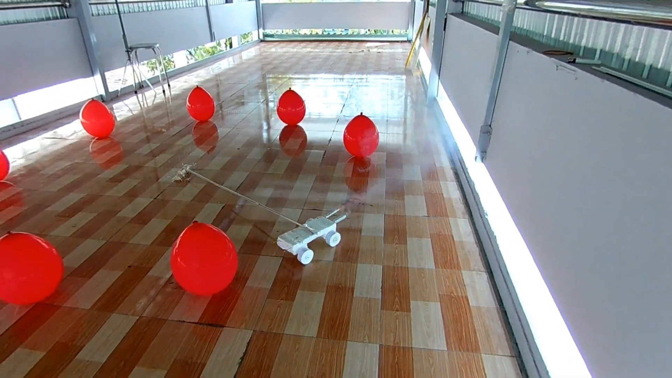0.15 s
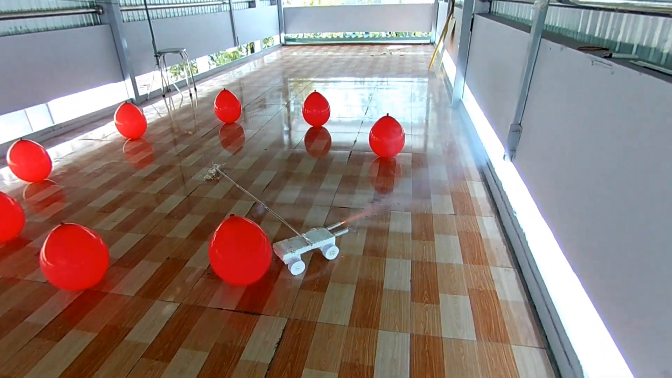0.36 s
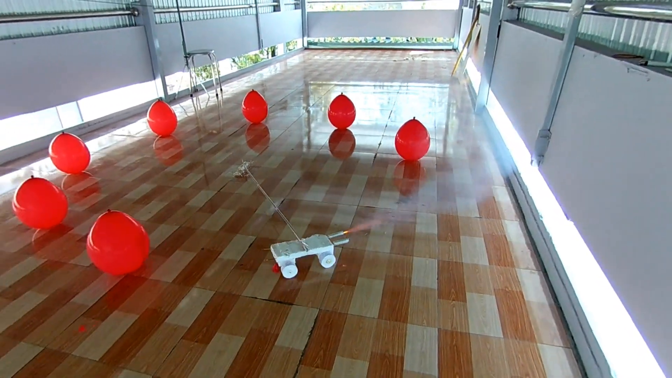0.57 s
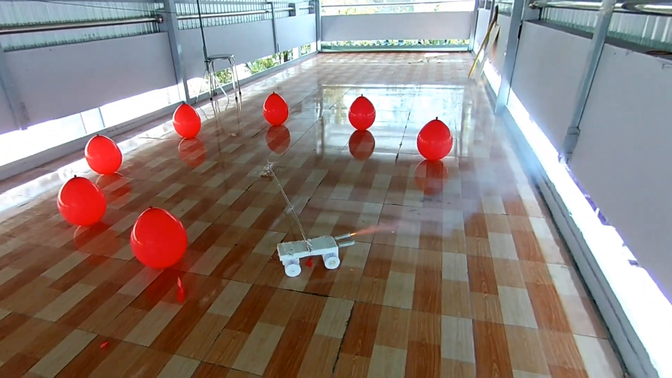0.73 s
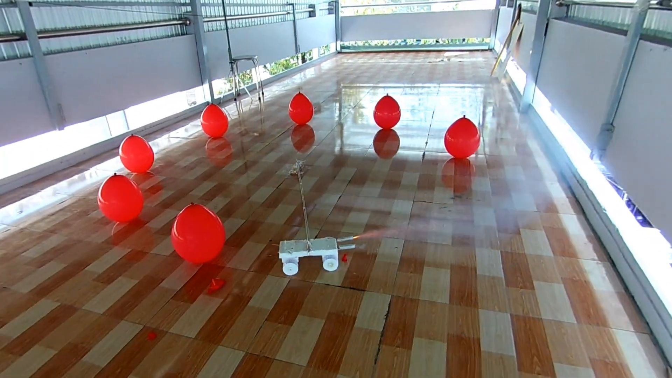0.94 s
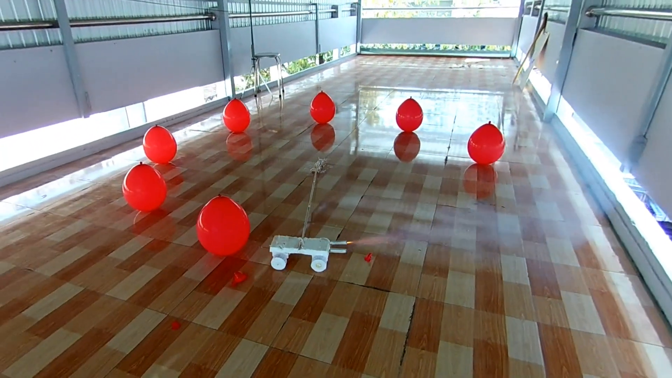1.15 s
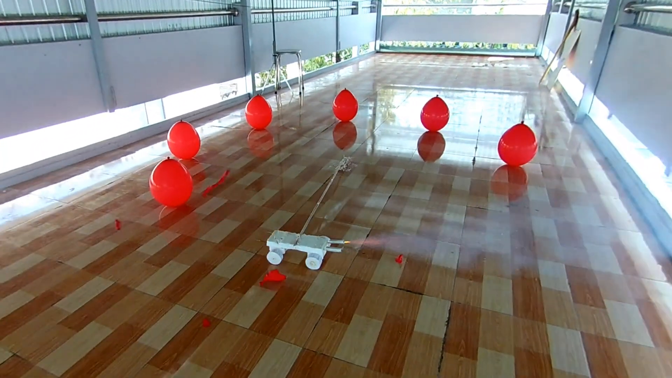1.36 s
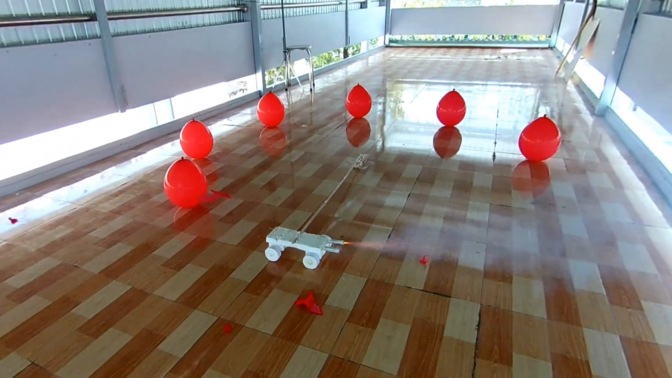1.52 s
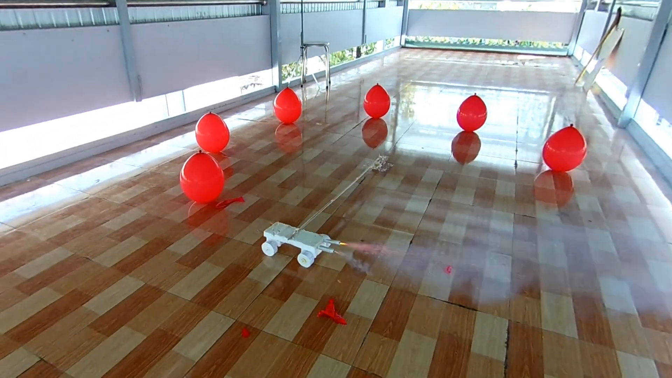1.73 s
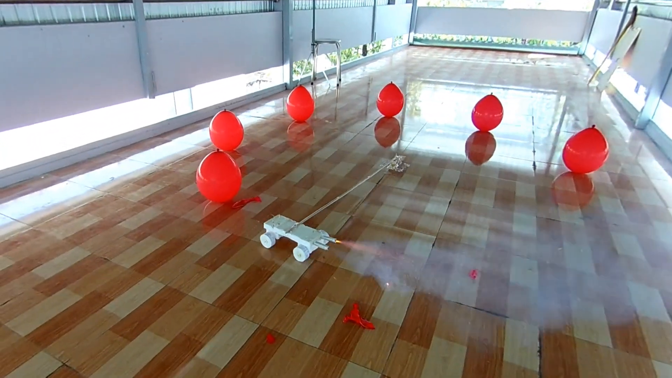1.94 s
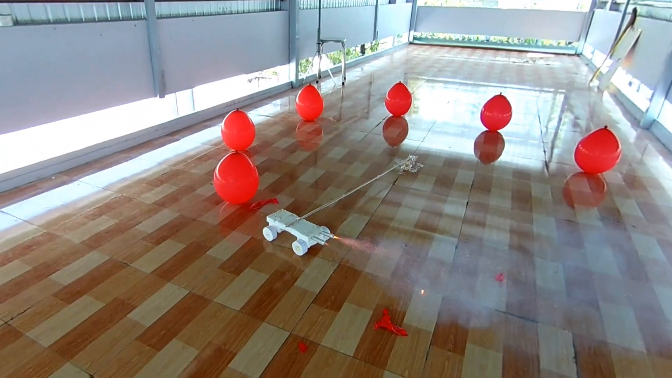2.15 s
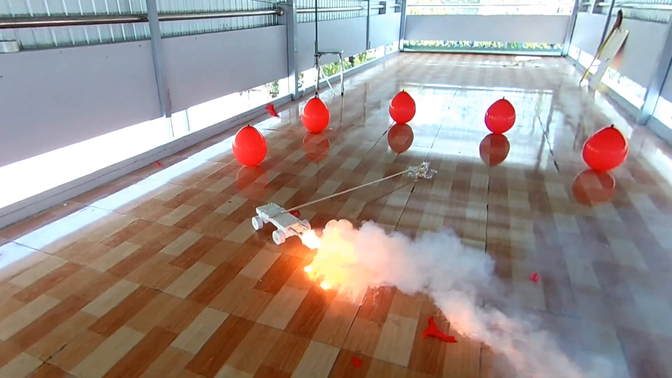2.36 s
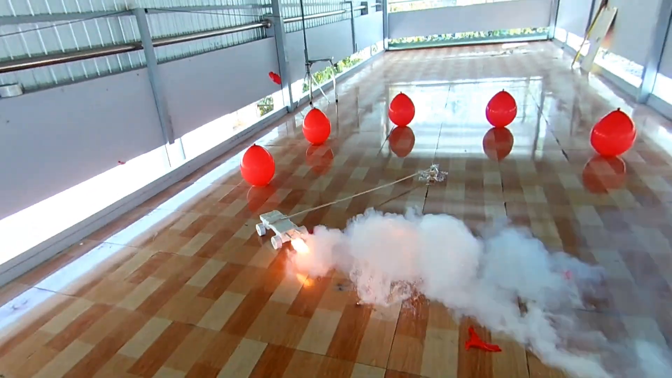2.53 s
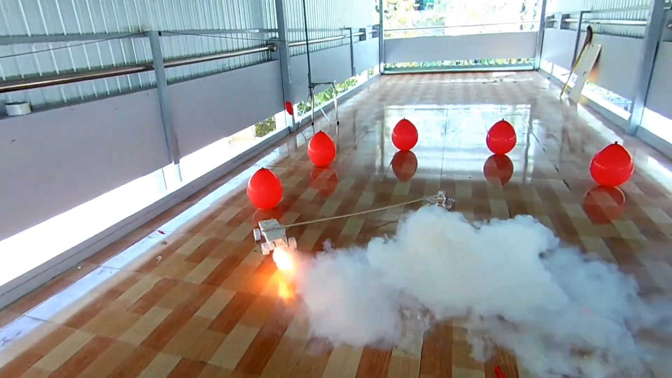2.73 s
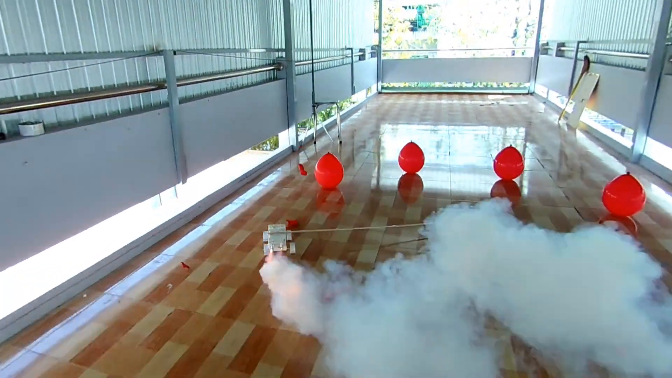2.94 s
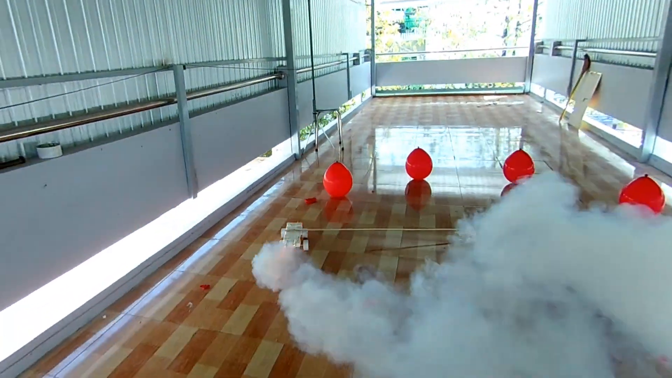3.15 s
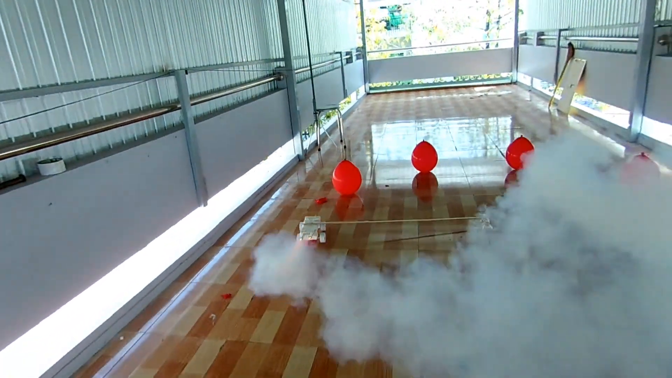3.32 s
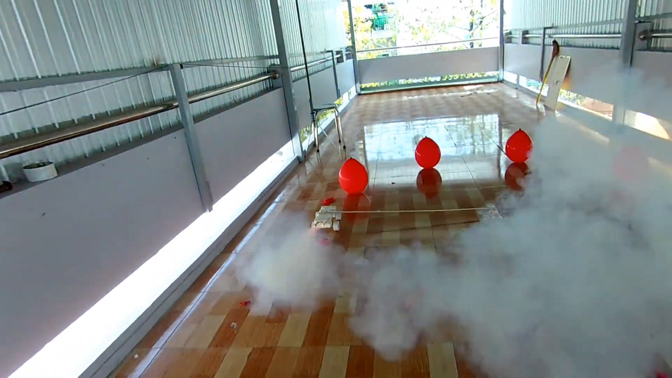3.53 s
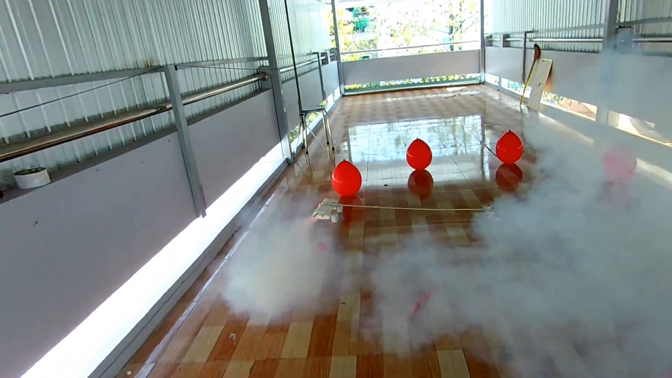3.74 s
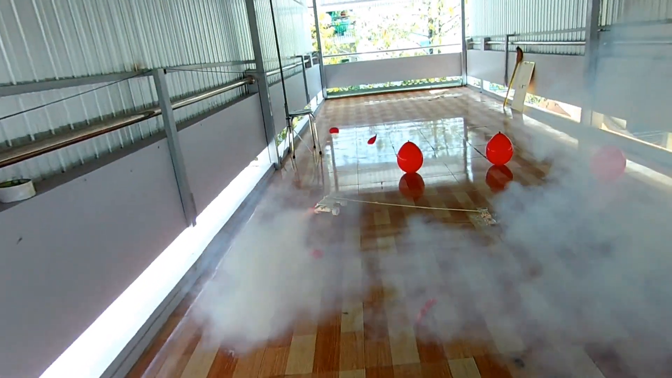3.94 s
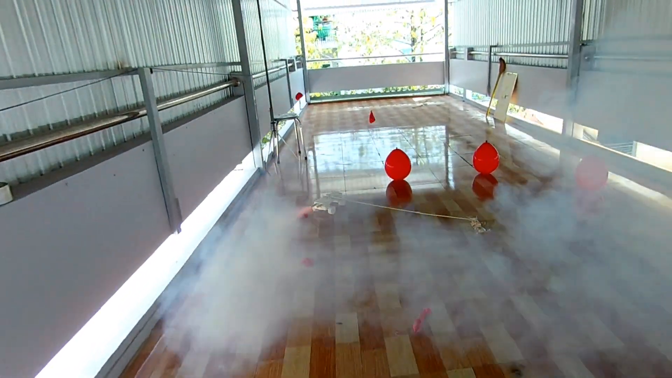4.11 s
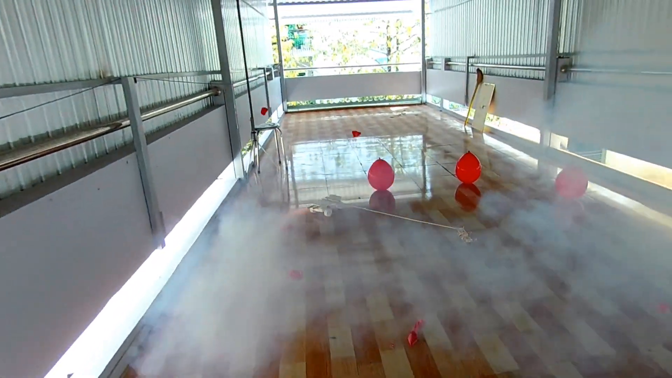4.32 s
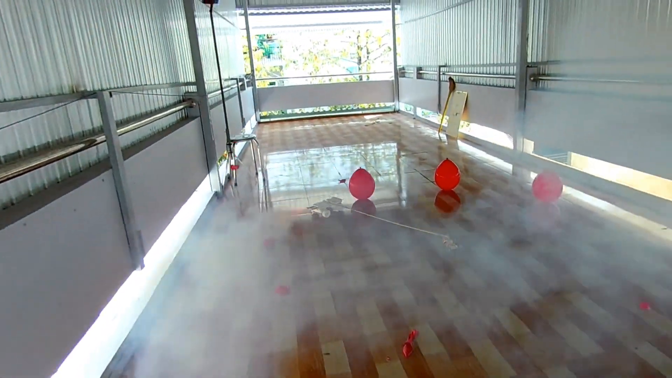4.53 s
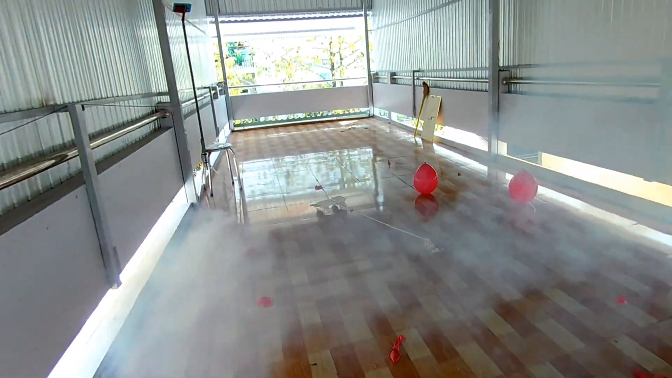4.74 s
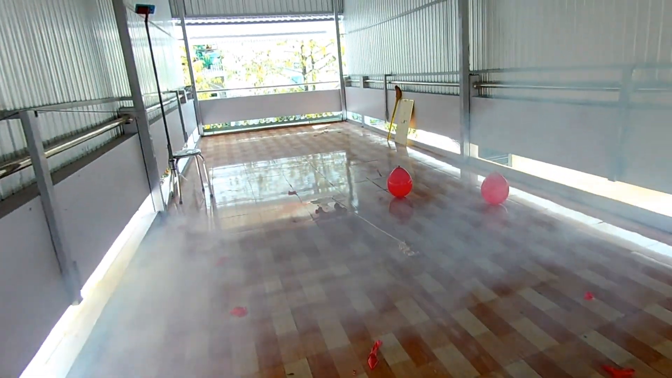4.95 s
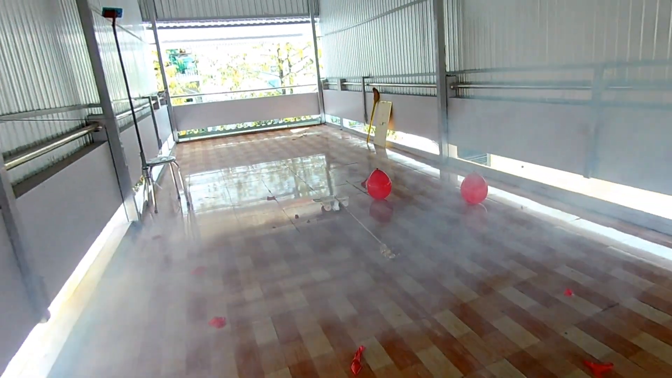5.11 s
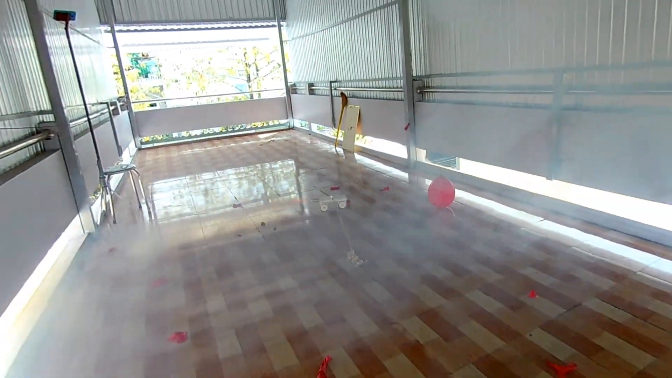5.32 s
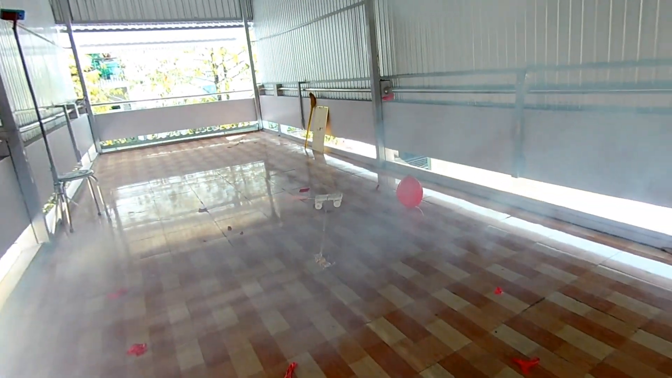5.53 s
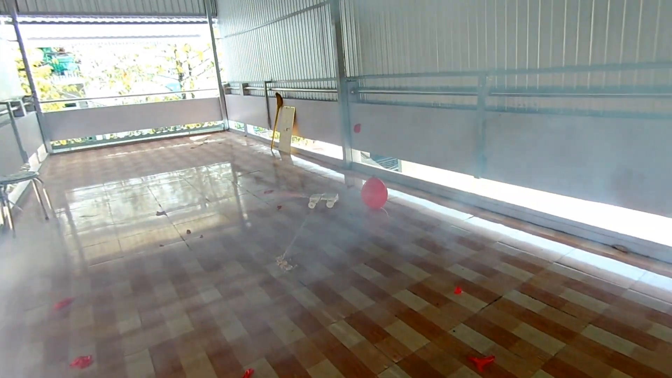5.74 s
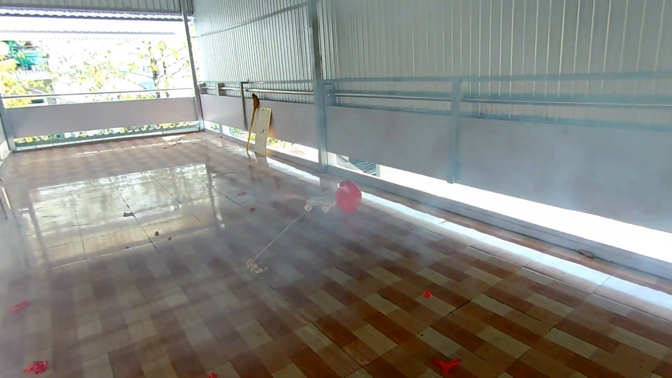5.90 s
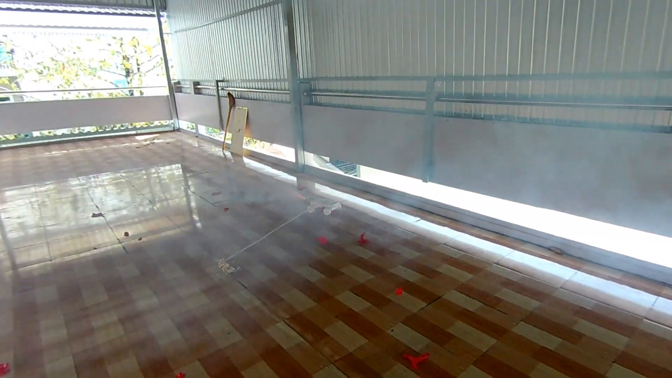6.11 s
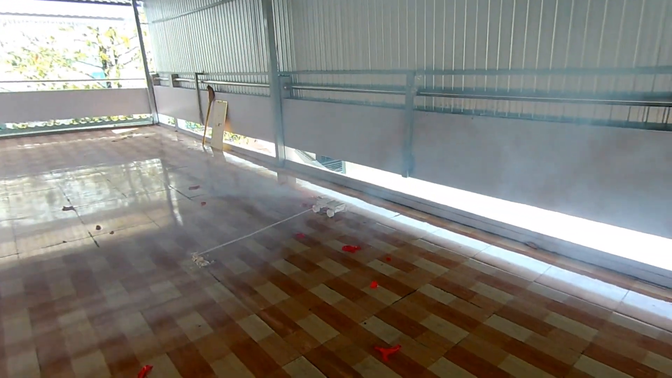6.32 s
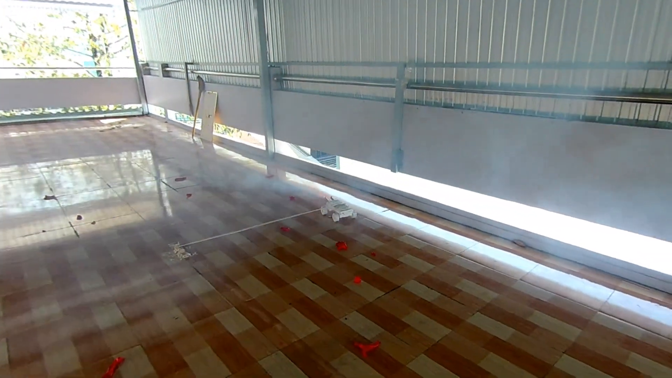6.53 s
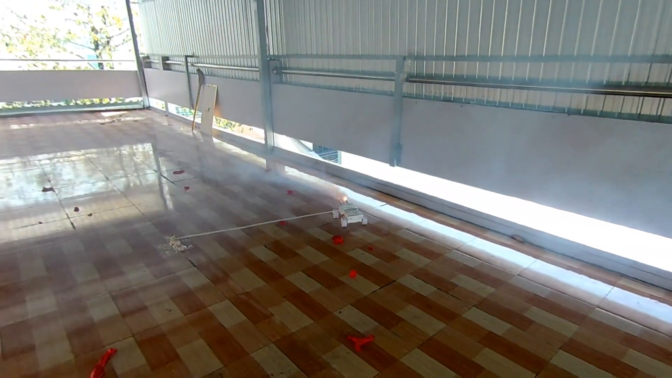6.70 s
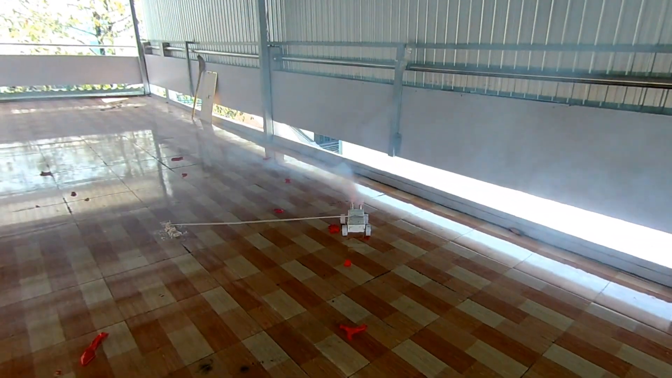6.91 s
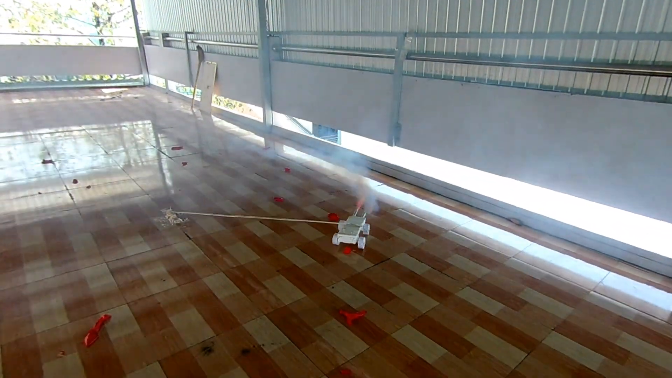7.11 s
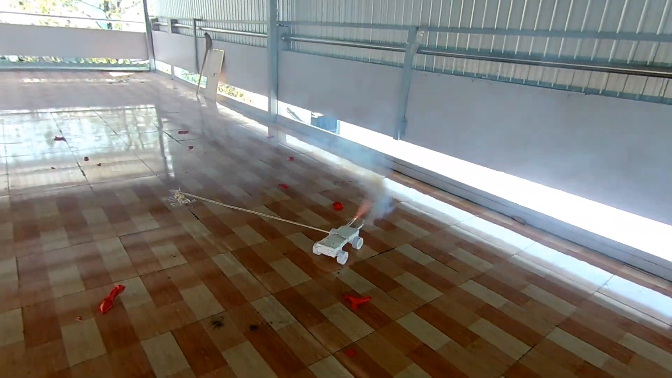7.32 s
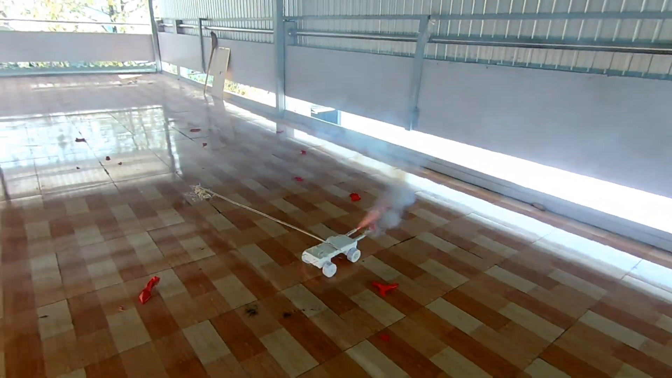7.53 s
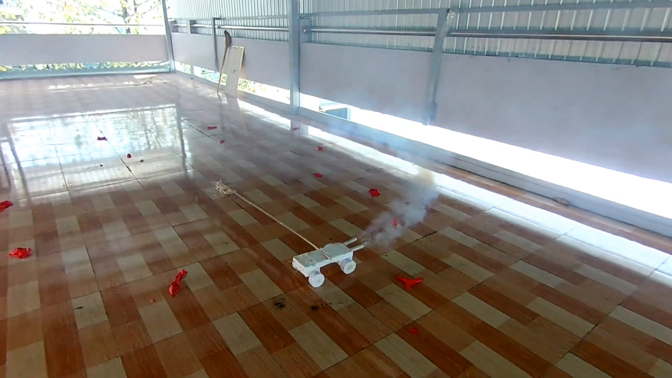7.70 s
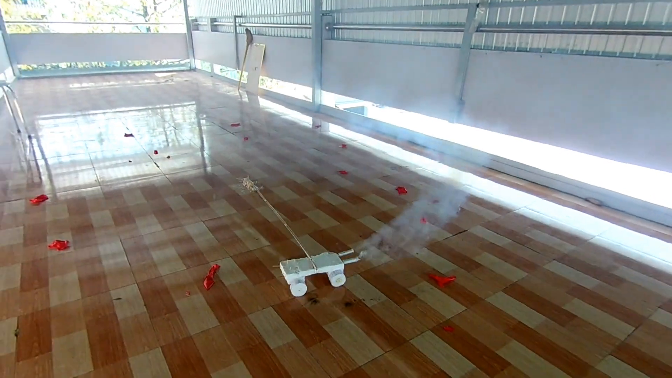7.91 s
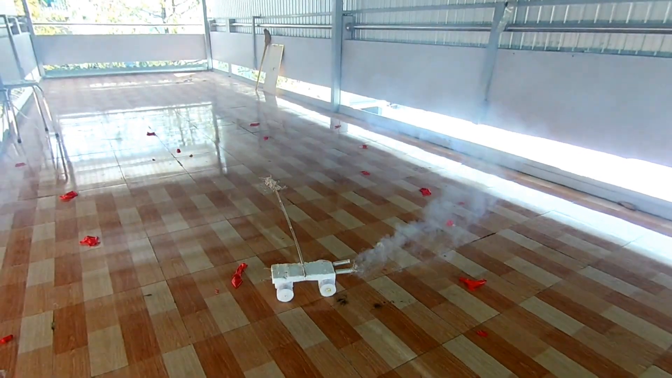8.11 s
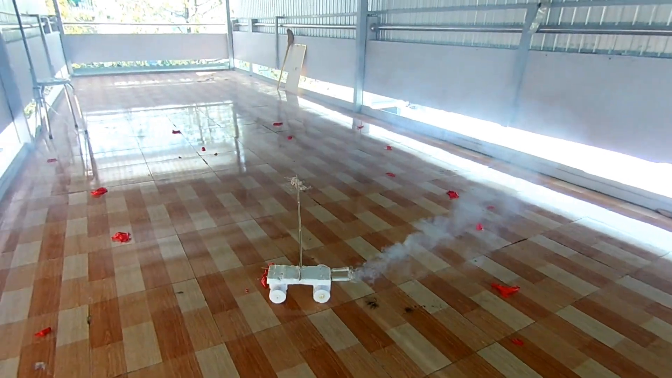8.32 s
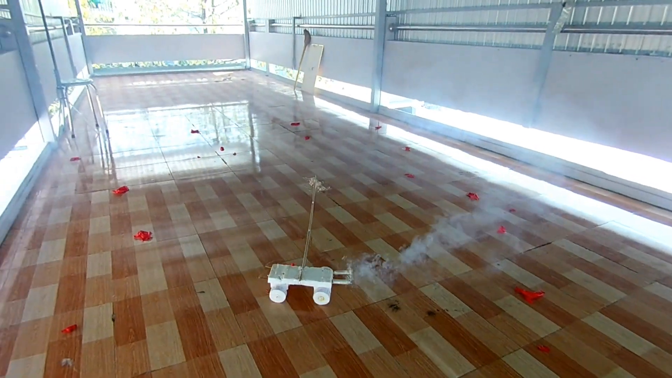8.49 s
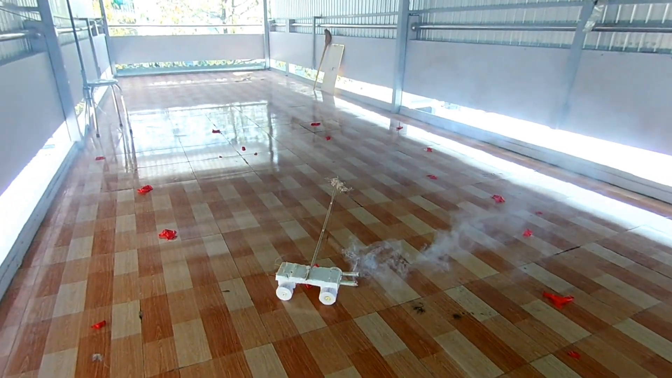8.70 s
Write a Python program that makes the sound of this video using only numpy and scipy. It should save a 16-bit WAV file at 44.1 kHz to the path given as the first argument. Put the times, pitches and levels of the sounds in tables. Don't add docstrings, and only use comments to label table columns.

```python
import sys
import numpy as np
from scipy import signal
from scipy.fft import rfft, irfft, next_fast_len
from scipy.io import wavfile
from scipy.ndimage import uniform_filter1d

SR = 44100
rng = np.random.default_rng(int(sys.argv[2]) if len(sys.argv) > 2 else 0)


def to_wav(s):
    ch = np.atleast_2d(s).T
    pcm = np.round(np.clip(ch, -1, 1) * 32767)
    wavfile.write(sys.argv[1], SR, pcm.astype(np.int16))


def rack_gain(trim_db):
    fader = np.asarray(trim_db, float)
    return 10 ** (fader / 20)


N = 390575

# centre_hz, width_hz, boost_db
MODES = [(187, 52, 4), (299, 12, 4.5), (1077, 46, 1.5), (1386, 17, 1), (1720, 26, 3), (2820, 50, 4.5),
         (3820, 150, 2.5)]
# start_s, first_wave_period_ms, ring_db, floor_bounce_hz, wall_bounce_hz
IGNITION = (2.2281, 1.33, -3, 800, 1449)


def evened(x):
    return x / np.sqrt(np.mean(x ** 2) + 1e-20)


def read(points, hz):
    f, value = np.transpose(points)
    return np.interp(np.log(hz + 1), np.log(f + 1), value)


def along(rows, column):
    rows = np.array(rows)
    return np.interp(np.arange(N) / SR, rows[:, 0], rows[:, column])


def add(mix, start_s, sound):
    part = mix[round(start_s * SR):][:len(sound)]
    part += sound[:len(part)]


def bells(rows, hz):
    return sum(db * np.exp(-((hz - f) / width) ** 2) for f, width, db in rows)


def coloured(x, db_at):
    size = next_fast_len(len(x) + 4096)
    gain = rack_gain(db_at(np.fft.rfftfreq(size, 1 / SR)))
    return irfft(rfft(x, size) * gain, size)[:len(x)]


def noise(db_at, patchy_db, flicker_db):
    frames, hz = N // 256 + 5, np.fft.rfftfreq(1024, 1 / SR)
    real, imag, patches = rng.standard_normal((frames, 513, 3)).T
    patches = uniform_filter1d(patches, size=10, axis=0)
    patches = evened(uniform_filter1d(patches, size=10, axis=1))
    flicker = evened(uniform_filter1d(rng.standard_normal(frames), size=4))
    level_db = db_at(hz)[:, None] + patchy_db * patches + flicker_db * flicker
    z = (real + 1j * imag) * rack_gain(level_db)
    return signal.istft(z, nperseg=1024, noverlap=768)[1][:N]


def outdoors():
    # freq_hz, level_db_per_hz
    rumble = [(15, -35), (25, -5.5), (54, -4.5), (81, -10), (125, -5), (154, -14), (207, -11.5),
              (1210, -25.5), (7090, -60.5), (11800, -54), (15000, -52)]
    return rack_gain(-51) * evened(noise(lambda hz: read(rumble, hz), patchy_db=1, flicker_db=-1.0))


def flare():
    # time_s, level_db
    catching = [
        (2.12, -40.5),
        (2.18, -48),
        (2.205, -35.5),
        (2.22, -23),
        (2.229, -25),
    ]
    rush_db = [(300, -7), (1500, 5.0), (4000, -6.0), (7000, -14.0), (12000, -11.5), (15000, -20.5)]
    rush = noise(lambda hz: read(rush_db, hz), patchy_db=2, flicker_db=1.5)
    t = np.arange(N) / SR
    burning = np.clip((t - catching[0][0]) / 0.037, 0, 1) * (t < catching[-1][0])
    return rack_gain(along(catching, 1)) * evened(rush) * burning


def motor():
    # freq_hz, level_db_per_hz
    jet_spectrum = [(24, -30), (40, -14.5), (86, -10.5), (165, -7.5), (256, -12), (363, -6), (550, -5),
                    (1200, -4.5), (1640, -7.5), (2100, -12), (2900, -17), (4000, -15), (7400, -26.5),
                    (8300, -62.5)]
    # time_s, level_db
    thrust = [(0.0, -36), (.43, -37.5), (.95, -37.5), (1.3, -38.5), (2.1, -37), (2.2, -34), (2.95, -35),
              (3.45, -35.5), (3.65, -34.5), (4.4, -35.5), (5.3, -35.5), (6.5, -37.5), (7.1, -36.5),
              (7.35, -39), (7.55, -39), (7.9, -47), (8.2, -52.5), (8.86, -66.5)]
    # start_s, extra_fizz_db
    coughs = [
        (7.366, 7),
        (7.839, -11),
    ]
    cough_s, steady_db = 0.067, -42
    second_motor_db, second_motor_s = 6, 0.58

    jet = noise(lambda hz: np.maximum(read(jet_spectrum, hz), -60) + bells(MODES, hz),
                patchy_db=2.0, flicker_db=0.4)
    size = next_fast_len(N)
    hz, spectrum = np.fft.rfftfreq(size, 1 / SR), rfft(jet, size)
    low = read([(350, 1), (750, 0)], hz)
    high = read([(1500, 0), (3600, 1)], hz)
    hiss, fizz, roar = [evened(irfft(spectrum * share, size)[:N]) for share in (1 - low - high, high, low)]

    t, thrust_db = np.arange(N) / SR, along(thrust, 1)
    spent_db = np.maximum(steady_db - thrust_db, 0)
    fizz_db = thrust_db - 7 - 1.14 * t - np.minimum(1.6 * spent_db, 6)
    fizz_db += sum(db * (t > s) * np.exp(-abs(t - s) / cough_s) for s, db in coughs)
    roar_db = thrust_db - 3 - 0.75 * t + 0.48 * spent_db
    since_s = t - IGNITION[0]
    roar_db += second_motor_db * (since_s > 0) * np.exp(-(since_s / second_motor_s) ** 2)
    out = rack_gain(thrust_db) * hiss + rack_gain(fizz_db) * fizz + rack_gain(roar_db) * roar

    sizzle_db = fizz_db - 18 + 0.5 * (fizz_db + 52.5)
    sizzle = noise(lambda hz: read([(7000, -38.5), (8000, -0.5), (13000, -10.0)], hz),
                   patchy_db=1.0, flicker_db=-1.0)
    return out + rack_gain(sizzle_db) * evened(sizzle)


def wave(ms, cycles, echo_ms, echo_db):
    # delay_ms, level_db
    early = [(4.7, -6.5), (7.5, -10), (11.3, -11.5), (16.5, -14), (23.1, -19), (31.7, -15.5)]
    u = np.arange(cycles * ms * SR / 1000) * 1000 / SR / ms
    shape = -np.sin(2 * np.pi * u) * np.exp(-0.45 * u / cycles) * np.minimum(u / 0.17, 1)
    taps = np.zeros(8192)
    taps[0], taps[int(echo_ms * SR / 1000)] = 1, rack_gain(echo_db)
    spread, sign = rng.uniform(0.85, 1.15, len(early)), rng.choice([-1., 1.], len(early))
    for (delay_ms, level_db), stretch, polarity in zip(early, spread, sign):
        taps[int(delay_ms * stretch * SR / 1000)] = polarity * rack_gain(level_db)
    bass_cut = signal.butter(2, 110, "high", fs=SR)
    return signal.lfilter(*bass_cut, signal.oaconvolve(taps, shape))


def ring(bass_db, treble_db, echo_ms, favoured=(), size=49152):
    # centre_hz, colour_db, t60_s, build_up_ms
    hall = [(30, -31.5, .3, 12), (71.3, -20.5, 0.22, 12), (146, -4, 0.35, 10), (296, -2, 0.69, 6.6),
            (594, 0.5, 0.69, 9.3), (810, -5.5, 0.74, 3.8), (1160, -2, 0.74, 2.1), (1800, -6, 0.81, 4),
            (2370, -13, 0.74, 2.3), (2970, -22, 0.83, 2.8), (3830, -20.5, 0.71, 2.9),
            (5450, -28.5, 0.81, 2.5), (7000, -31, 0.52, 4.1), (11800, -43.5, 0.46, 2.5)]
    t, hz = np.arange(size) / SR, np.fft.rfftfreq(size, 1 / SR)
    centres_hz, colour_db, t60_s, rise_ms = np.transpose(hall)
    tilt_db = [(250, bass_db), (900, 0.021), (2000, 0.025), (5000, treble_db)]
    colour_db = colour_db + read(tilt_db, centres_hz)
    crowd_db = 1.4 * evened(uniform_filter1d(rng.standard_normal(len(hz)), size=14))
    colour = rack_gain(read(np.transpose([centres_hz, colour_db]), hz) + bells([*MODES, *favoured], hz) + crowd_db)

    density = np.minimum((9000 + 400000 * t) / SR, 1)
    specks = rng.standard_normal(size) * (rng.random(size) < density) / np.sqrt(density)
    spectrum = rfft(specks) * evened(colour)
    out = np.zeros(size)
    for share, decay_s, rise in zip(np.eye(len(hall)), t60_s, rise_ms):
        band = irfft(spectrum * read(np.transpose([centres_hz, share]), hz), size)
        out += band * rack_gain(-60 * t / decay_s) * (1 - np.exp(-(1000 * t / rise) ** 2))

    laps = 1000 * t / echo_ms
    swells = rack_gain(3 * uniform_filter1d(laps % 1 - 0.5, size=400) * np.exp(-laps / 1.5))
    fresh = 1 + 1.25 * np.exp(-t / 0.023)
    return out * swells * fresh


def crack(ms):
    t = np.arange(900) / SR - ms / 2000
    tear = signal.lfilter([1], [1, -0.6], rng.standard_normal(len(t)))
    return tear * (t > 0) * np.exp(-t / 0.0031)


def thuds():
    # start_s, period_ms, wave_db, ring_db, bass_db
    soft_thuds = [
        (2.155, 2.3, -18, -34, -1),
        (2.813, 7.5, -27, -41.5, 13.5),
        (2.89, 4.8, -32, -41, 11),
        (3.549, 12.5, -41.5, -38.5, 18.5),
        (3.80, 7.1, -24, -48.5, -2),
        (4.5788, 0.85, -12.5, -41, 1),
        (4.5801, 5, -14, -32.5, 2.5),
        (4.591, 4.2, -14.5, -33, 12),
        (7.366, 6, -24, -37.5, 4),
        (7.839, 1, -33, -45, -14),
    ]
    out = np.zeros(N)
    far_wall_ms, far_wall_db = 68, -16
    for s, ms, wave_db, ring_db, bass_db in soft_thuds:
        add(out, s, -rack_gain(wave_db) * wave(ms, 0.97, far_wall_ms, far_wall_db))
        add(out, s, rack_gain(ring_db) * ring(bass_db, -4, far_wall_ms, size=24576))
    return out


def bangs():
    # start_s, first_wave_period_ms, ring_db, floor_bounce_hz, wall_bounce_hz
    balloons = [
        (.4361, 1.86, -3.5, 533, 1400),
        (1.3336, 2.6, -2.5, 610, 1400),
        (2.351, 3.1, -4.5, 470, 1300),
        (2.9699, 2.63, -3.5, 543, 1400),
        (3.9371, 2.3, -3.5, 293, 1110),
        (4.7028, 2, -4, 440, 1050),
        (5.3093, 1.76, -4.5, 383, 780),
        (5.9884, 0.76, -3.5, 594, 1680),
    ]
    lap_s, farthest_s = 7, 3.4
    flutter_ms, flutter_loss_db = 1.29, 1.7
    out = np.zeros(N)
    for row in sorted([*balloons, IGNITION]):
        s, ms, ring_db, floor_hz, wall_hz = row
        tear_db, bass_db, treble_db = (-5, -10, 2.9) if row == IGNITION else (-19.5, 2.9, 0)
        cycles = max((flutter_ms / ms) ** 3, 1)
        lap = 2 * np.pi * (s - farthest_s) / lap_s
        echo_ms = 67 + 14 * np.cos(lap)
        echo_db = -11.5 + 5.5 * np.sin(lap / 2)
        favoured = [(f, 0.2 * f, boost_db) for f, boost_db in
                    ((floor_hz, 2.5), (wall_hz, 3.5), (2 * wall_hz, 0))]
        wave_db = 9 - flutter_loss_db * (cycles - 0.5)
        add(out, s, rack_gain(wave_db) * wave(ms, cycles, echo_ms, echo_db))
        add(out, s, rack_gain(tear_db - 3.7 * np.cos(lap)) * crack(ms))
        add(out, s, rack_gain(ring_db) * ring(bass_db, treble_db, echo_ms, favoured))
    return out


def scene():
    return (outdoors() + flare() + motor() + thuds() + bangs())[None]


def low_pass(x):
    return signal.sosfilt(signal.butter(12, 15610, fs=SR, output="sos"), x)


def record(dry):
    # freq_hz, gain_db
    passband = [(15, -12), (40, 0), (4000, 0)]
    # freq_hz, gain_db
    chain = [(7200, -4.5), (7900, -18.5), (8500, -8), (12800, -4.5), (13500, -18), (14200, -9.5),
             (15300, -19), (15700, -48)]
    knee, ceiling, self_noise_db = 3.5, 1.035, -76.5
    squashed = ceiling * dry / (ceiling ** knee + abs(dry) ** knee) ** (1 / knee)
    bass_cut = coloured(squashed[0], lambda hz: read(passband, hz))
    clipped = np.clip(bass_cut, -ceiling, ceiling)
    dulled = coloured(clipped, lambda hz: read([*passband[-1:], *chain], hz))
    dulled += rack_gain(self_noise_db) * rng.standard_normal(N)
    return low_pass(np.clip(dulled, -1, 1)[None])


dry = scene()
out = record(dry)
to_wav(out)
```